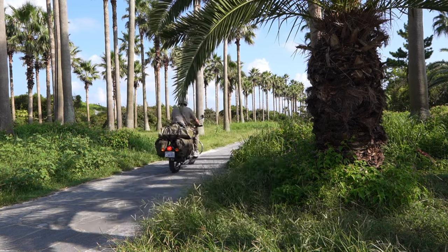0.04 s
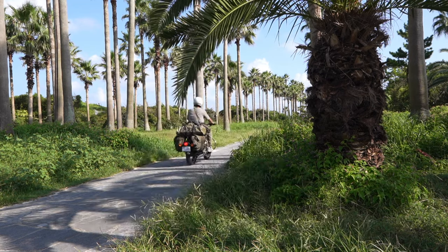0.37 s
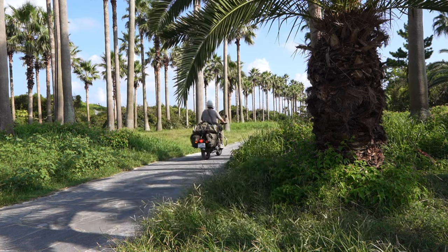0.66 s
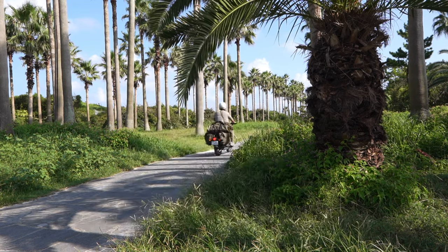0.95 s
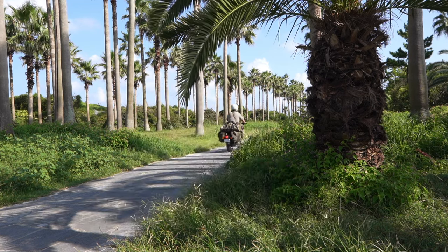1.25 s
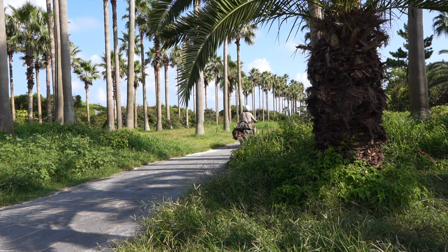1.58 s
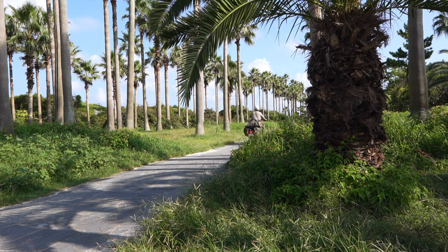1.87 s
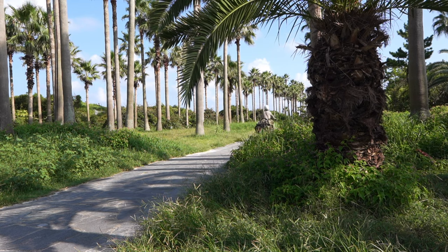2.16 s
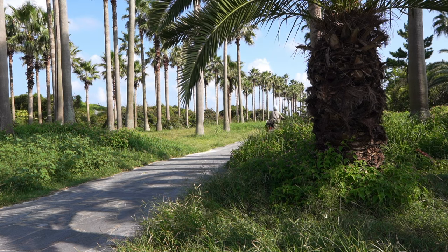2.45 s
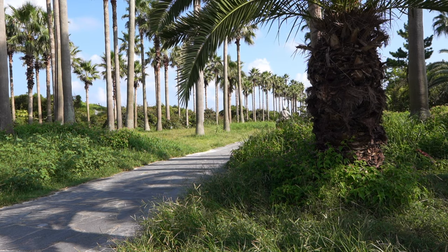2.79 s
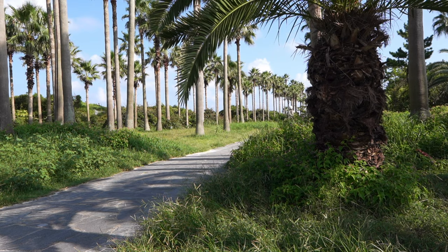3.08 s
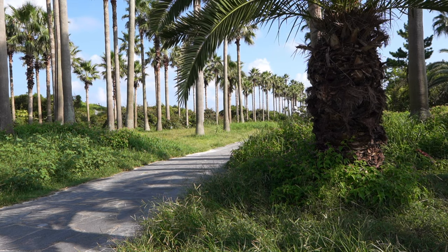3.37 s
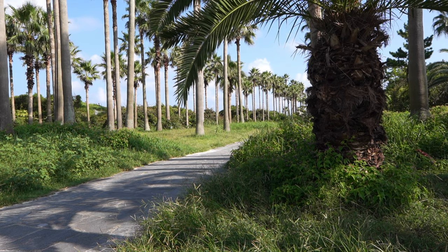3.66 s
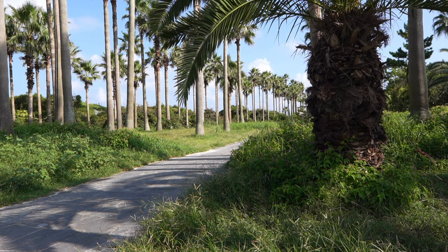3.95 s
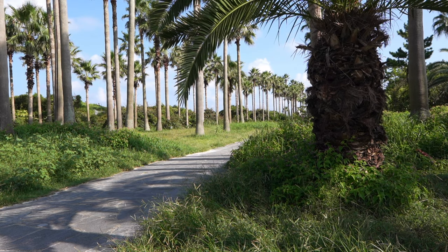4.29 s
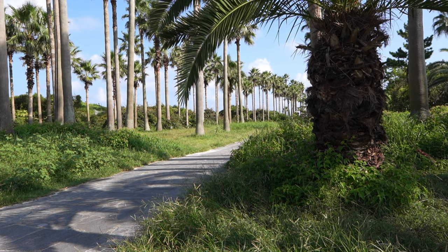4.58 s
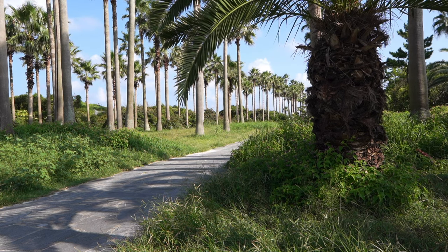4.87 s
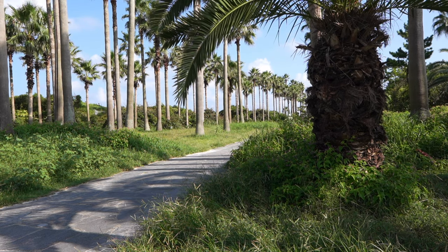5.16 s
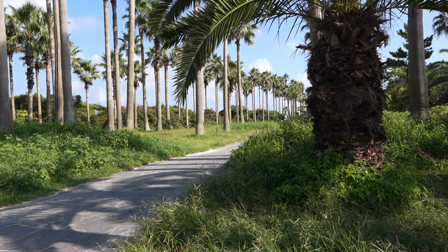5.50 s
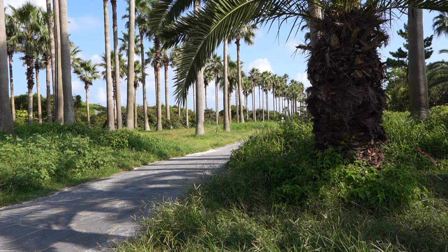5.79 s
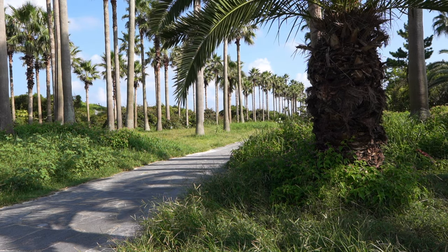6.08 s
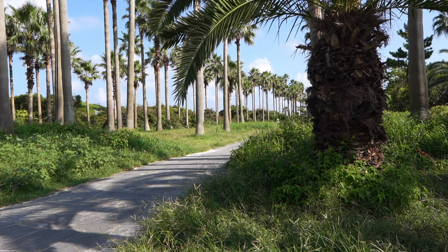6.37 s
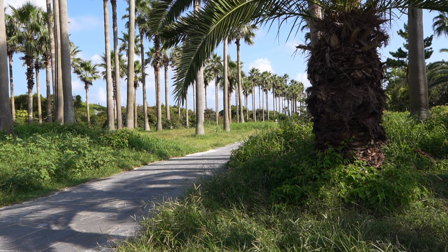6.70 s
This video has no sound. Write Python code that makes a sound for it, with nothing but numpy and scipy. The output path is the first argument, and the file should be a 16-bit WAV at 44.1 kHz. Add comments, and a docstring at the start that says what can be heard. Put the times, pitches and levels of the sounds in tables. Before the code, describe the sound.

A big single-cylinder motorcycle is already pulling away at the start, about nine metres from a stationary microphone on a palm-lined lane. Each firing is a deep thump with a bark and a sharp crack, echoing briefly off the trunks. Around 0.3 seconds the beat dips and lopes unevenly as the clutch bites, then gradually quickens from about nine to seventeen beats a second. Light tyre rush and mechanical rattle sit underneath. The bike grows steadily quieter as it recedes. From 2.5 seconds it passes behind an overgrown bend, and the bark and rattle fall away, leaving a muffled thump that swells slightly near 3.3 seconds. Just after 4 seconds the throttle eases and the level drops further. The exhaust keeps thumping softly, far off, until the end at about 6.7 seconds, over a very faint hush of air and high trilling insects.

```python
"""A palm-lined lane. A big single-cylinder motorcycle pulls away about nine metres from the microphone,
loping briefly as the clutch bites. Each firing is an exhaust thump, a bark of gas and a sharp crack,
scattered by the trunks. As it slowly gathers speed, grass and distance take the treble away. From 2.5 s
it slips behind an overgrown bend; just after 4 s the rider eases off. Engine clatter and tyres fade
into a faint outdoor hush with trilling insects, while the exhaust thumps on, far off."""
import sys
import numpy as np
from scipy import signal
from scipy.fft import rfft, irfft
from scipy.io import wavfile
from scipy.ndimage import uniform_filter1d

SR = 44100
rng = np.random.default_rng(int(sys.argv[2]) if len(sys.argv) > 2 else 0)


def wav_out(sig):
    """Save sig, one row per channel (or a flat mono array), as 16-bit PCM at SR to the path in sys.argv[1]."""
    wavfile.write(sys.argv[1], SR, np.round(np.clip(np.atleast_2d(sig).T, -1, 1) * 32767).astype(np.int16))


N = 297234
TIME = np.arange(N) / SR

# spectra of the still air and of the insects in the grass: f/Hz, relative level/dB
HUSH_COLOUR = [(30, -2.5), (100, 31), (500, 6.5), (2500, -3.5), (5000, 2), (9000, -2), (15000, -2.5)]
INSECT_COLOUR = [(5300, -53.5), (5800, -19.5), (6100, -4), (6380, 0.5), (6750, -6), (7050, -15.5),
                 (7400, -46.5)]
# likeness of scattered sound at the two sides of the microphone: f/Hz, correlation
DIFFUSE_LIKENESS = [(90, .998), (250, 1), (640, 0.83), (1400, 0.41), (3100, .1), (8000, 0.035)]
# rush of tyres and engine block, rattle of valve gear and chain: t/s, relative level/dB
ROLL_FADE = [(0.0, -57), (2.01, -55.5), (4.54, -67.5), (6.74, -70.5)]
RATTLE_FADE = [(0, -51), (.7, -50), (1.5, -53.5), (2.3, -57.5), (2.8, -67), (3.6, -73.5), (5, -103)]
# their spectra: f/Hz, relative level/dB
ROLL_COLOUR = [(50, -25.5), (130, -8), (300, 1.5), (650, -8), (1000, 3), (1500, -0.5), (2000, -2.5),
               (2800, -6), (3800, -15.5), (5300, -27.5), (8000, -29), (15000, -45)]
RATTLE_COLOUR = [(2500, 1.5), (4000, -4.5), (5300, -7.5), (7500, -1.5), (9500, -7), (11800, -15.5),
                 (15000, -14.5)]
# bearing of the bark and running gear as the lane bends: t/s, left minus right level/dB
BEARING = [(0, 1.5), (.7, 0), (2, -1.5), (3, 0), (4.5, 2.5), (6.74, 5.5)]
# engine speed as heard at the microphone: t/s, firing rate/Hz
FIRING_RATE = [(0.0, 10.44), (0.437, 8.924), (0.471, 9.857), (1.517, 13.15), (1.548, 13.255),
               (1.992, 13.642), (2.319, 14.409), (3.04, 14.942), (3.599, 15.246), (4.155, 15.837),
               (6.545, 16.505), (6.7, 17.23)]
# moments at which the bike is close, up the lane and at the bend: t/s
STAGES_S = [0.19, 1.42, 3.02]
# thump and bark, coloured by the path over grass: f/Hz, relative level/dB (close, lane, bend, far)
THUMP_COLOUR = [(32.8, -61, -73, -66, -52.5), (60.2, -16, -11.5, -18.5, -10), (97.5, -3.5, -2, -6.5, -6),
                (130.8, -2, -1, 0.5, 3), (163, -2, -3, -10.5, -17.5), (178.7, 2, -5, -2, 2.5),
                (244.7, -6.5, 2.5, 0.5, 2.5), (300.6, -26.5, -9, -11, -8), (385, -15.5, -23.5, -26, -24.5),
                (411.3, -8.5, -7.5, -10.5, -10), (465, -23, -22, -25.5, -28.5),
                (900, -39, -41, -69.5, -59.5)]
BARK_COLOUR = [(299, -21, -27, -22, -14), (481, -20.5, -3, -18, -9), (526, 2, -4, 1, -9),
               (664, -5.5, -1.5, -28, -32), (785, -4.5, -2, 4, -11), (1065, 5.5, 2, -3.5, 11),
               (1360, -3, 0.5, 0.5, -6), (1540, -7.5, -5.5, -9.5, -26), (1930, -4.5, 2, -6.5, 8),
               (2855, -11, 0.5, -24, -31), (3190, -13.5, -14.5, -13.5, -11), (5200, -16.5, -28, -48, -34),
               (9000, -32, -48.5, -66, -30)]
# crack at the pipe's mouth: f/Hz, relative level/dB (close, lane, from the bend on)
CRACK_COLOUR = [(1484, -38, -23, -33), (3800, -12.5, -7, -20), (5250, -15, -39, -10),
                (6760, 3.5, 1.5, 16.5), (8290, 3, 6, 5.5), (10200, -13.5, -5, -11), (10950, -20, -7, 4.5),
                (10900, -23, -32, -46), (13670, -9, -18, -38)]
# crack against bark, set by the throttle and by leaves in the way: t/s, relative level/dB
CRACK_OVER_BARK = [(0.3, 1.5), (.7, 7), (.9, 0), (1.24, 1), (1.34, -8), (1.64, -3.5), (2.0, -8.5),
                   (4.0, -17.5), (4.5, 0.5), (4.9, -17.5)]

START_M, SPEED_M_S, ACCEL_M_S2 = 8.6, 3.69, 1.05  # the ride away from the microphone
CLUTCH_S, LOPE_LATE_S, LOPE_FADE_S, LOPE_DB = .3, .01538, .2594, 3
BEND_S, BEND_FADE_S, BEND_DB = 2.474, 0.6, -18  # the overgrowth screens bark and crack
EASE_S, EASE_FADE_S, EASE_THUMP_DB, EASE_BARK_DB = 4.145, 0.31, -10.5, -1  # the throttle eases


def undb(db):
    """Decibels to gain."""
    return 10 ** (np.asarray(db) / 20)


def unit(x):
    """Scale to rms 1."""
    return x / np.sqrt(np.mean(x ** 2))


def curve(rows, s=TIME):
    """Join (t/s, value) rows by straight lines."""
    return np.interp(s, *np.transpose(rows))


def settle(s, start_s, fade_s):
    """A change that begins at start_s and settles from 0 to 1."""
    return 1 - np.exp(-np.maximum(s - start_s, 0) / fade_s)


def on_log_axis(points, size):
    """Read (f/Hz, value) points at the bins of a transform."""
    hz, value = np.transpose(points)
    return np.interp(np.log(np.arange(size // 2 + 1) * SR / size + 1), np.log(hz), value)


def ring(points, size=8192):
    """Causal impulse response of a body with the given (f/Hz, level/dB) spectrum."""
    cepstrum = irfft(np.log(undb(on_log_axis(points, size))))
    cepstrum[1:size // 2] *= 2
    cepstrum[size // 2 + 1:] = 0
    return irfft(np.exp(rfft(cepstrum)))


def through(x, response):
    """Pass both channels through an impulse response."""
    return signal.fftconvolve(x, np.atleast_2d(response), axes=-1)[:, :x.shape[-1]]


def pair(likeness, size=N):
    """Left and right noise with the given correlation."""
    mid, side = rfft(rng.standard_normal((2, size)))
    mid, side = mid * np.sqrt((1 + likeness) / 2), side * np.sqrt((1 - likeness) / 2)
    return irfft([mid + side, mid - side], size)


def diffuse(size=N):
    """Noise from all around the microphone: alike in the bass, unrelated in the treble."""
    return pair(on_log_axis(DIFFUSE_LIKENESS, size), size)


def wander(rate_hz):
    """Smooth random drift with rms 1."""
    hold = int(SR / rate_hz)
    steps = np.repeat(rng.standard_normal(N // hold + 1), hold)
    return unit(uniform_filter1d(steps, hold)[:N])


def add(track, s, sound, db, span_s):
    """Place a sound so that its level over its first span_s seconds is db."""
    start = max(int(s * SR), 0)
    sound = sound * undb(db) / np.sqrt(np.mean(sound[..., :int(span_s * SR)] ** 2))
    track[:, start:start + sound.shape[-1]] += sound[..., :N - start]


def hush(level_db):
    """Still air over the lane: a low, steady noise from all sides."""
    return unit(through(diffuse(), ring(HUSH_COLOUR))) * undb(level_db)


def insects(level_db, trill_hz, trill_db, flicker_db):
    """Insects in the grass on either side of the microphone trill in one narrow band."""
    chorus = unit(through(pair(likeness=-0.44), ring(INSECT_COLOUR)))
    trill = np.sin(2 * np.pi * np.cumsum(trill_hz * (1 + 0.021 * wander(3.7))) / SR)
    flicker = np.array([wander(50), wander(50)])
    return chorus * undb(level_db + trill_db * trill + flicker_db * flicker)


def grove(x, t60_s, onset_s, spots=7, size=30000):
    """Trunks and undergrowth send back a fading scatter whose pattern shifts as the bike moves."""
    out, t, step = np.zeros((2, N + size)), np.arange(size) / SR, N // (spots - 1)
    envelope = (1 - np.exp(-(t / onset_s) ** 2)) * np.exp(-np.log(1000) * t / t60_s)
    for centre in step * np.arange(spots):
        span = np.arange(max(centre - step, 0), min(centre + step, N))
        trunks = undb(4 * np.repeat(rng.standard_normal(size // 100), 100))
        response = unit(diffuse(size) * trunks * envelope) / np.sqrt(size)
        stretch = x[:, span] * np.cos(np.pi / 2 * (span - centre) / step)  # crossfade between spots
        out[:, span[0]:span[-1] + size] += signal.fftconvolve(stretch, response, axes=-1)
    return out[:, :N]


def lane_scatter(thump, bark, crack, trunk_hz=74.3):
    """The exhaust comes back off the palms; the longest waves bend round the trunks instead."""
    short_waves = signal.sosfilt(signal.butter(2, trunk_hz, "high", fs=SR, output="sos"), thump)
    bark_share_db = -11 + 7.5 * settle(TIME, BEND_S, BEND_FADE_S)  # grows as the direct path is screened
    return (undb(-8.0) * grove(short_waves, t60_s=0.41, onset_s=0.0028)
            + undb(bark_share_db) * grove(bark, t60_s=0.91, onset_s=0.0129)
            + undb(-15.5) * grove(crack, t60_s=0.13, onset_s=0.01094))


def running_gear():
    """Tyres and engine block give a rough rush; at close range valve gear and chain rattle above it."""
    roll = unit(through(diffuse(), ring(ROLL_COLOUR)))
    roll *= undb(curve(ROLL_FADE) - 1.5 + 1.2 * wander(40))
    rattle = unit(through(diffuse(), ring(RATTLE_COLOUR)))
    rattle *= undb(curve(RATTLE_FADE) - 6.0 + 1.5 * wander(360))
    return roll + rattle


def firings(first_s=.0169):
    """Time and lope (0-1) of each firing: as the clutch takes the load, every other one comes late."""
    cycles = np.cumsum(curve(FIRING_RATE)) / SR
    cycles -= np.interp(first_s, TIME, cycles)
    index = np.arange(int(cycles[-1]) + 1)
    s = np.interp(index, cycles, TIME)
    lope = (index % 2) * (s > CLUTCH_S) * (1 - settle(s, CLUTCH_S, LOPE_FADE_S))
    return s + LOPE_LATE_S * lope, lope


def strengths(s, lope, grass_db_per_m=0.41):
    """Level/dB of each firing's thump, bark and crack, from distance, the bend and the throttle."""
    ridden_m = SPEED_M_S * s + ACCEL_M_S2 * s ** 2 / 2
    spreading = -20 * np.log10(1 + ridden_m / START_M)
    eased, hidden = settle(s, EASE_S, EASE_FADE_S), settle(s, BEND_S, BEND_FADE_S)
    thump_chance, bark_chance = rng.standard_normal((len(s), 2)).T
    thump = -36.5 + spreading + EASE_THUMP_DB * eased
    thump += (0.3 + 0.7 * eased) * thump_chance  # less even off the throttle
    thump += 1.5 * np.exp(-((s - 3.27) / .22) ** 2)  # a brief swell in the bend
    bark = -33 + spreading - grass_db_per_m * ridden_m + BEND_DB * hidden + EASE_BARK_DB * eased
    bark += LOPE_DB * lope + 0.65 * bark_chance
    return thump, bark, bark + curve(CRACK_OVER_BARK, s)


def colour_at(table, s, spread_db):
    """One firing's spectrum follows the path, then the easing throttle; no two burn quite alike."""
    rows = np.array(table, float)
    pulling = np.array([np.interp(s, STAGES_S, row[1:1 + len(STAGES_S)]) for row in rows])
    db = pulling + settle(s, EASE_S, EASE_FADE_S) * (rows[:, -1] - pulling)
    return np.c_[rows[:, 0], db + spread_db * rng.standard_normal(len(rows))]


def puffs(times, levels, colour, spread_db, delay_s, rise_s, fall_s, tail_db, tail_s,
          repeat, likeness, span_s, size=2600):
    """Turbulent gas bursts from the pipe at each firing; part of its pattern is the same every time."""
    out, t = np.zeros((2, N)), np.arange(size) / SR
    decay = np.exp(-t / fall_s) + undb(tail_db) * np.exp(-t / tail_s)
    envelope = (1 - np.exp(-(t / rise_s) ** 2)) * decay
    pattern = pair(likeness, size)
    for s, db in zip(times, levels):
        gas = repeat * pattern + pair(likeness, size)
        body = ring(colour_at(colour, s, spread_db), size=2048)
        add(out, s + delay_s, through(gas * envelope, body), db, span_s)
    return out


def thumps(times, levels):
    """Each firing sends a pressure pulse that rings the exhaust."""
    out = np.zeros((2, N))
    for s, db in zip(times, levels):
        add(out, s, ring(colour_at(THUMP_COLOUR, s, spread_db=1.0)), db, span_s=0.021)
    return out


def scene():
    """The lane from the microphone: still air and insects behind the departing bike and its scatter."""
    times, lope = firings()
    thump_db, bark_db, crack_db = strengths(times, lope)
    thump = thumps(times, thump_db)
    bark = puffs(times, bark_db, BARK_COLOUR, spread_db=2.16, delay_s=.0001, rise_s=0.0006,
                 fall_s=0.0054, tail_db=-14.5, tail_s=0.027, repeat=0.55, likeness=0.99, span_s=0.0085)
    crack = puffs(times, crack_db, CRACK_COLOUR, spread_db=2.8, delay_s=0.00035, rise_s=0.00067,
                  fall_s=0.00037, tail_db=-28.5, tail_s=0.0068, repeat=0.85, likeness=.82, span_s=0.0034)
    scatter = lane_scatter(thump, bark, crack)
    sides = np.array([[.5], [-.5]])
    bike = thump + (bark + running_gear()) * undb(sides * curve(BEARING))
    bike += crack * undb(sides * 1.6)  # a little left of centre
    background = hush(level_db=-80.5)
    background += insects(level_db=-74.5, trill_hz=24.7, trill_db=1.5, flicker_db=1.5)
    return background + scatter + bike


def record(dry):
    """The recorder cuts the top above 16 kHz."""
    return signal.sosfilt(signal.ellip(8, .2, 70, 16000, fs=SR, output="sos"), dry)


dry = scene()
out = record(dry)
wav_out(out)
```